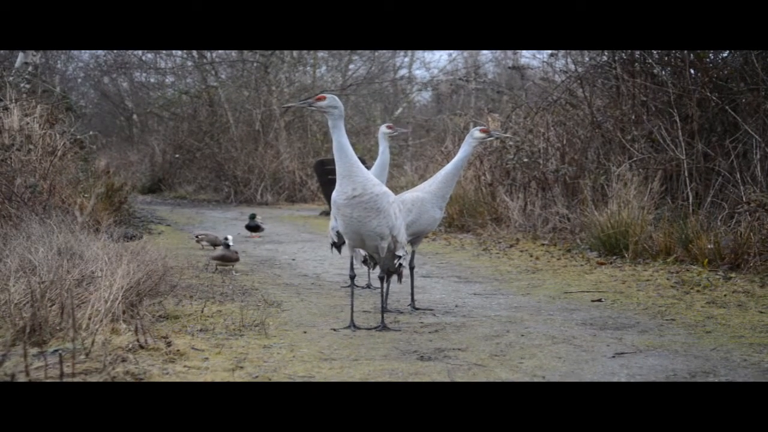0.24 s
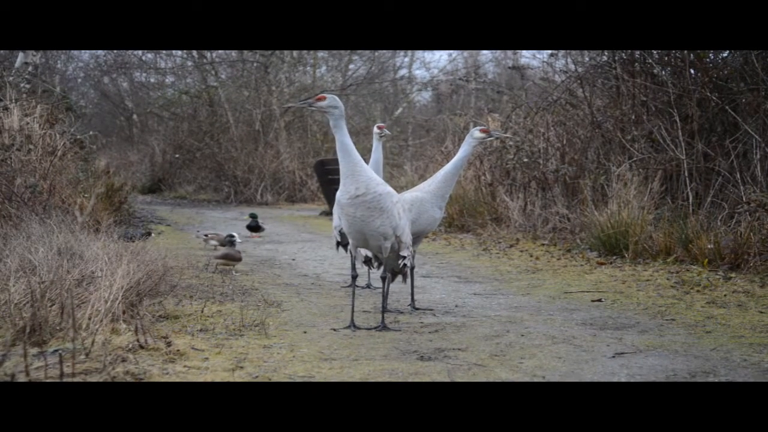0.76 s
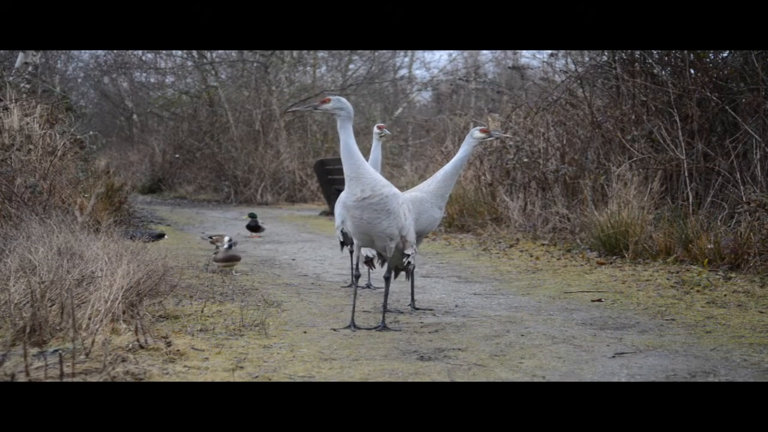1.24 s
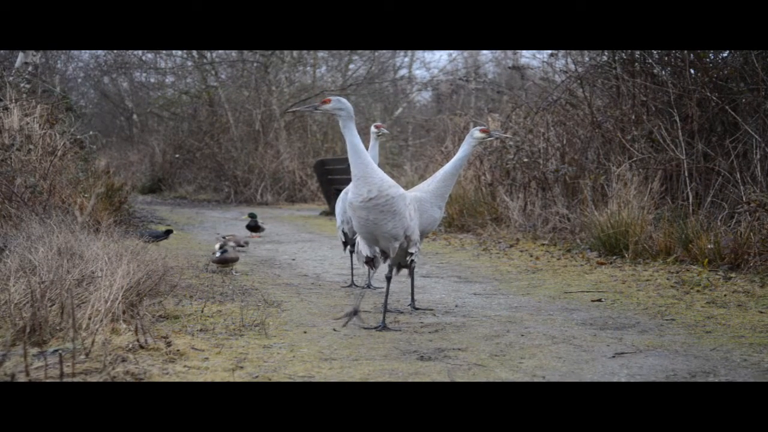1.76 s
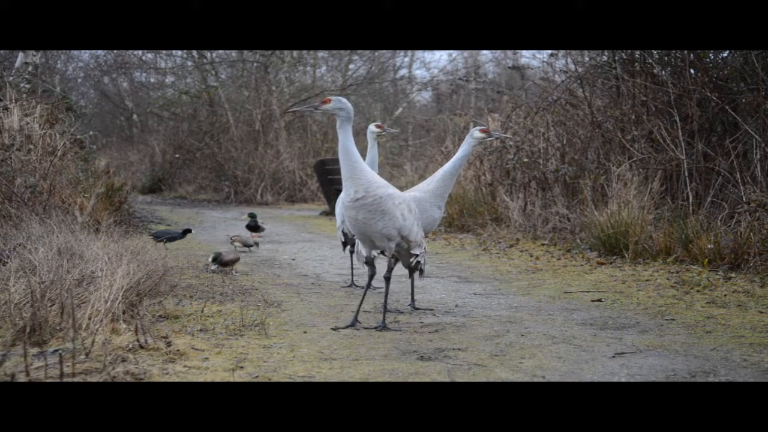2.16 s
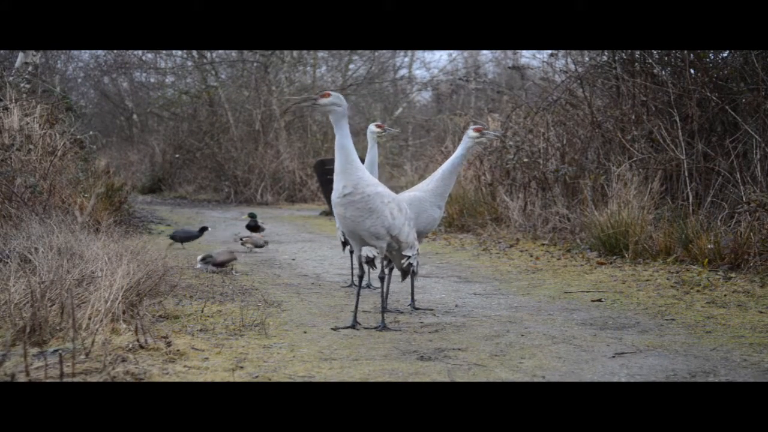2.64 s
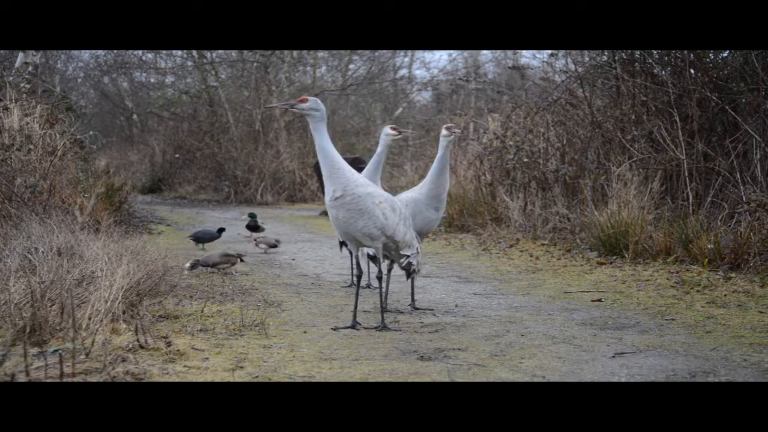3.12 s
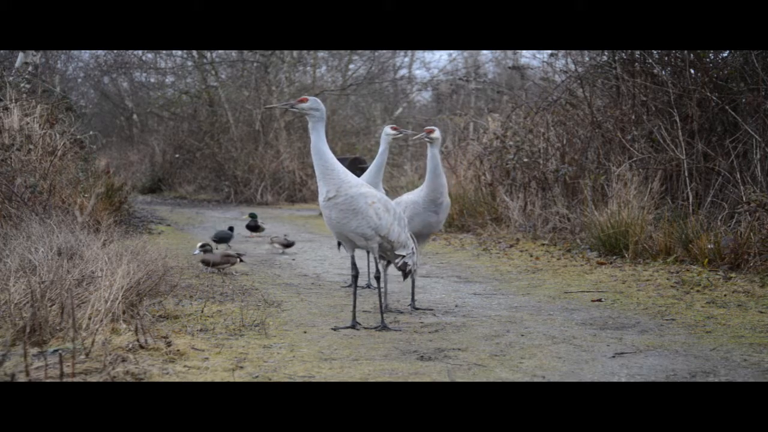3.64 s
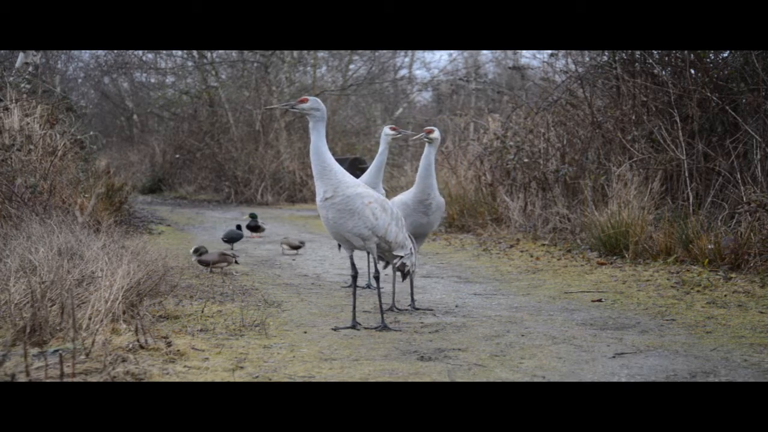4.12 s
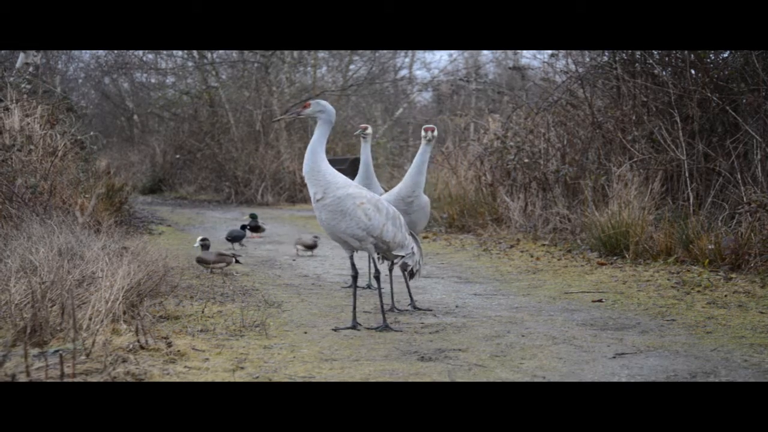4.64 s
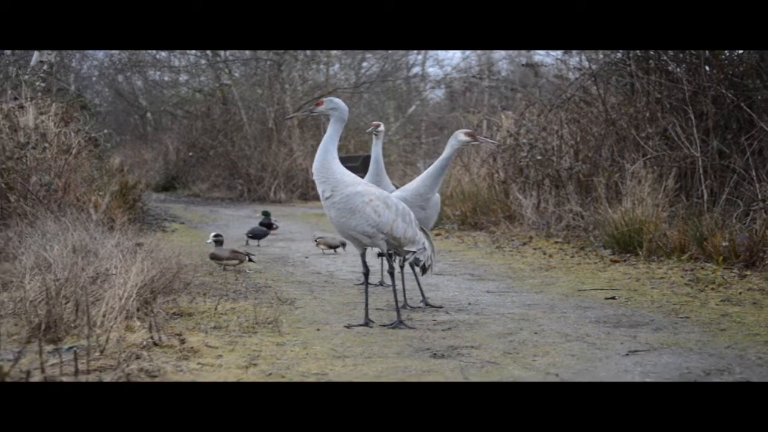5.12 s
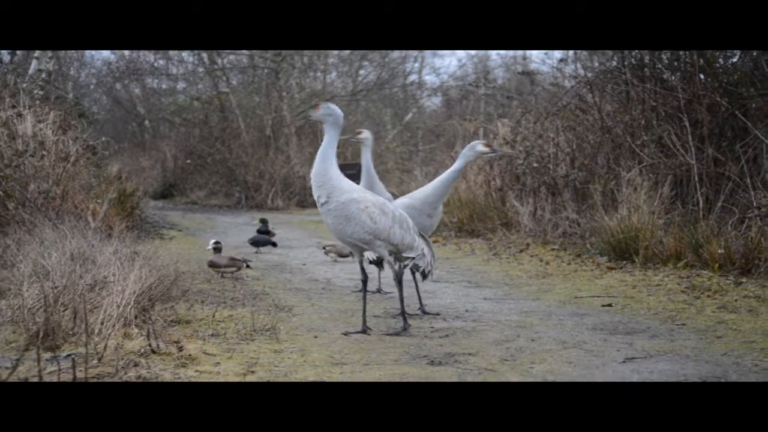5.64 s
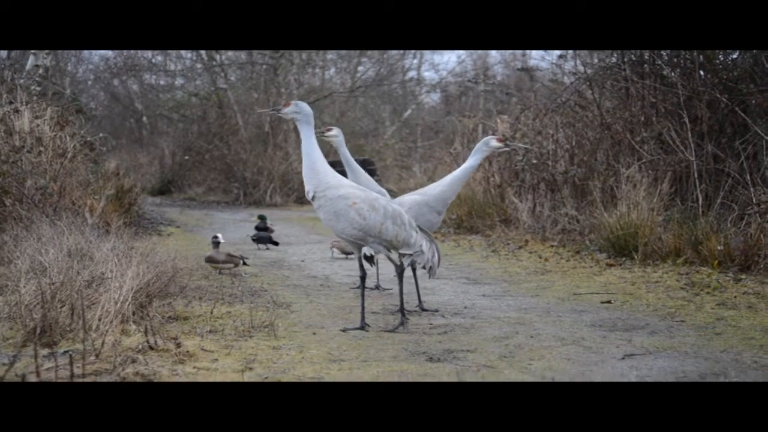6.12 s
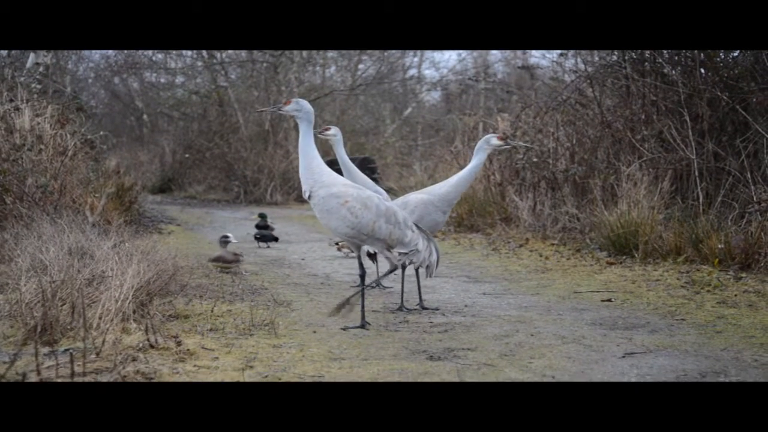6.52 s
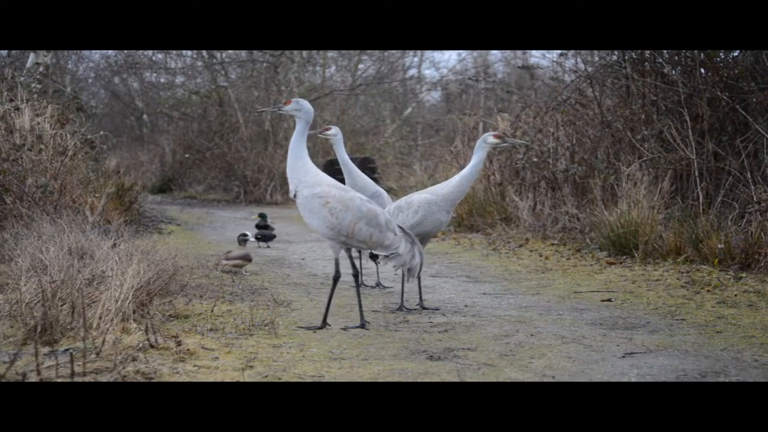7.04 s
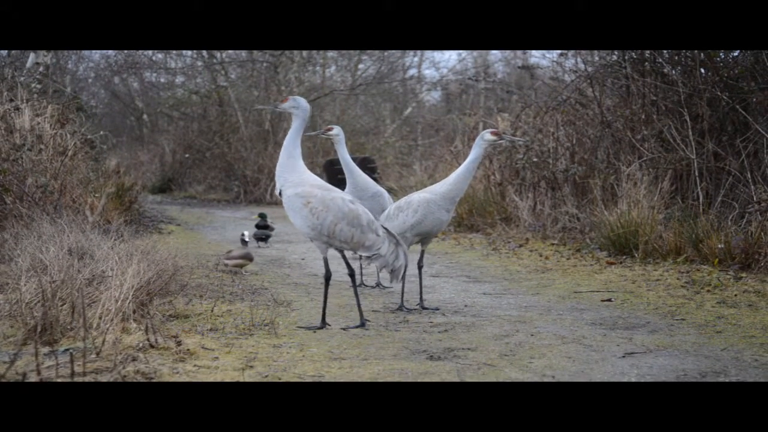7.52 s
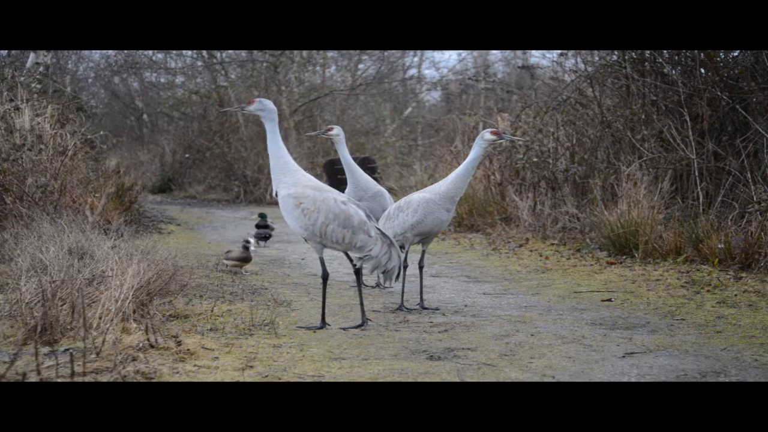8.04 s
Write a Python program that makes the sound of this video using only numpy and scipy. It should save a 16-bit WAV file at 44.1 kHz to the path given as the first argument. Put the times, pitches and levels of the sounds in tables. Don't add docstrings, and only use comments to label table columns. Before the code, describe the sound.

Quiet open air with steady soft hiss, a faint low engine hum drifting in and out and a barely audible thin whine. At 0 s a short close rustle and a cluster of bright clicks on the camera body, thinning to sparse ticks and tiny faint waterfowl peeps until 2.5 s. At 2.56 s cranes suddenly bugle: a very short held reedy note near 1 kHz, then from 2.7 to 3.25 s a loud rolling rattle of overlapping bursts from three birds, deep and higher, quickening and fading into a croak. The thicket echoes faintly. From 4 to 5.6 s there are soft cloth rubs and clicks, with a sharp snap near 4.67 s. At 5.69 s the second call repeats the pattern, rattling until about 6.47 s, slightly clipped and ducking the hiss. The echo decays, leaving hiss, low hum, occasional ticks and peeps until 8.3 s.

```python
import sys
import numpy as np
from scipy import signal
from scipy.fft import rfft, irfft, next_fast_len
from scipy.io import wavfile
from scipy.ndimage import uniform_filter1d, map_coordinates

SR = 44100
rng = np.random.default_rng(int(sys.argv[2]) if len(sys.argv) > 2 else 0)


def store_wav(level_fs):
    pcm = np.round(np.clip(np.atleast_2d(level_fs), -1, 1) * 32767)
    wavfile.write(sys.argv[1], SR, pcm.T.astype(np.int16))


def volts(x):
    e = np.asarray(x, float) / 20
    return 10 ** e


N = 364707


def unit(x):
    return x / np.sqrt(np.mean(x ** 2) + 1e-20)


def along(points, hz):
    f, v = np.transpose(points)
    return np.interp(np.log(hz + 1), np.log(f + 1), v)


def level(rows):
    s, db = np.transpose(rows)
    return volts(np.interp(np.arange(N) / SR, s, db, -150, -150))


def shiver(count, rate):
    knots = rng.standard_normal(int(count * rate / SR) + 4)
    return map_coordinates(knots, [np.arange(count) * rate / SR])


def wobble(rate):
    return shiver(N, rate)


def filtered(x, response):
    m = next_fast_len(N + SR // 2)
    return irfft(rfft(x, m) * response(np.fft.rfftfreq(m, 1 / SR)), m)[:N]


def noise(spectrum):
    return unit(filtered(rng.standard_normal(N), lambda hz: volts(along(spectrum, hz))))


def tail(t60s, count):
    hz, t, z = signal.stft(rng.standard_normal(count), SR, nperseg=128)
    fade = volts(-60 * t / along(t60s, hz)[:, None])
    h = signal.istft(z * fade, SR, nperseg=128)[1]
    return h / np.linalg.norm(h)


def add(track, s, sound):
    start = round(s * SR)
    track[start:start + len(sound)] += sound[:len(track) - start]


# time in seconds, level in dB.
AIR_LEVEL = [(0, -48.5), (0.45, -50), (0.71, -52.5), (3.9, -52), (5.6, -52), (7.1, -50), (8.029, -51),
             (8.27, -53.5)]
# frequency in Hz, density in dB per Hz.
HISS_COLOUR = [(12, -26), (25, -0.5), (70, 6), (150, -3.5), (327, -5.5), (870, -9), (2010, -10),
               (3330, -12.5), (4530, -11.5), (4920, -9.5), (5350, -10), (8370, -21.5), (14600, -25.5),
               (15900, -23)]
# time in seconds, level in dB.
ENGINE_LEVEL = [(0.0, -57), (0.39, -72), (1.31, -58), (2.39, -69), (2.85, -57.5), (4.12, -68), (4.98, -71),
                (5.6, -57), (7.25, -52.5), (8.27, -70)]


def background():
    t = np.arange(N) / SR
    s, db = np.transpose(AIR_LEVEL)
    crackle_db = 0.21 * wobble(2.8) + 1.46 * wobble(120)
    air = volts(np.interp(t, s, db) + 0.5 + crackle_db) * noise(HISS_COLOUR)
    engine_hz, whine_hz = 151, 4815
    engine = np.sin(2 * np.pi * engine_hz * t + .8 * wobble(10))
    engine = level(ENGINE_LEVEL) * volts(3 + 1.3 * wobble(4)) * engine
    whine = volts(-62.0 + 2.3 * wobble(26)) * np.sin(2 * np.pi * whine_hz * t + wobble(40))
    return air + engine + whine


# peak in seconds, rise in seconds, fall in seconds, level in dB, dull part in dB.
RUSTLES = [(0.024, 0.013, 0.035, -28, -1.5), (0.05, 0.025, 0.12, -42.5, -4.5),
           (4.235, 0.026, 0.049, -43, -5), (4.34, 0.074, 0.064, -42.5, -7.5), (4.44, 0.14, 0.18, -38, -6.5),
           (4.71, 0.042, 0.045, -46, 0.5), (4.93, 0.041, 0.037, -44, -13),
           (5.339, 0.018, 0.023, -50.5, -10), (5.435, 0.043, .06, -53.5, -5),
           (5.598, 0.021, 0.022, -36.5, -16), (5.688, 0.019, 0.0082, -27.5, -10)]
# frequency in Hz, density in dB per Hz.
CLOTH_COLOUR = [(2120, -45), (3600, -4.5), (5230, 9.5), (5850, -4.5), (6490, -1), (8500, -19.5),
                (11000, -28.5), (14300, -70.5), (22000, -120)]
# frequency in Hz, density in dB per Hz.
FOLDS_COLOUR = [(290, -31), (500, -1.5), (673, -23), (863, -1.5), (3400, 3), (4420, -70), (7480, -120)]


def rustles():
    edge_db, squareness = 38, 2.8
    slips = volts(1.8 * wobble(250) + .6 * wobble(34))
    s, rise_s, fall_s, db, dull_db = np.transpose(RUSTLES)[:, :, None]
    t = np.arange(N) / SR - s
    away = np.abs(t / np.where(t < 0, rise_s, fall_s))
    swell = volts(db - edge_db * away ** squareness)
    bright = swell.sum(0) * unit(slips * noise(CLOTH_COLOUR))
    dull = (volts(dull_db) * swell).sum(0) * unit(slips * noise(FOLDS_COLOUR))
    return bright + dull


def soft(f):
    return 1 / (1 + 1j * f / 6000) ** 2


# start in seconds, peak in dB, pitch in Hz, length in ms.
SMALL_TONES = [(0.386, -45, 1500, 5.2), (0.728, -49.5, 2260, 19), (1.2494, -59, 3390, 26),
               (1.3594, -56, 2030, 23), (.178, -46, 3150, 7), (.275, -48, 3780, 5), (1.44, -61, 4140, 60),
               (1.526, -52, 624, 17), (1.55, -62, 4100, 100), (1.72, -65, 4200, 70), (2.18, -62, 570, 35),
               (2.327, -52, 4700, 7), (2.388, -52, 1900, 4.2), (5.251, -48, 1720, 4.5), (5.433, -41, 2720, 5),
               (7.232, -51, 526, 8), (7.241, -46, 6360, 9), (7.66, -54, 3070, 5.4), (7.832, -49, 5100, 5),
               (7.935, -57, 3320, 8), (7.97, -65, 876, 200), (8.022, -39, 5500, 4.2), (8.158, -56, 4750, 4),
               (6.6278, -44, 1170, 12), (7.868, -48, 4600, 11)]


def small_tones():
    tones = np.zeros(N)
    for s, db, hz, ms in SMALL_TONES:
        t = np.arange(0, ms / 1000, 1 / SR)
        swell = np.sin(np.pi * t / t[-1])
        add(tones, s, volts(db + 7.0) * np.sin(2 * np.pi * hz * t) * swell)
    return filtered(tones, soft)


# start in seconds, peak in dB, sharp edge in dB.
TICKS_BRIGHT = [(0.0143, -10.5, -26), (0.0249, -16, -37), (0.048, -25, -34), (.08, -31, -34),
                (.101, -32, -30), (0.1237, -36, -28), (0.179, -37.5, -23), (0.2377, -34, -20),
                (0.256, -29, -32), (0.6867, -37, -35), (0.7301, -26.5, -32), (0.989, -26.5, -27),
                (1.2802, -32.5, -34), (1.583, -37, -31), (1.649, -36, -26), (1.667, -41, -28),
                (2.017, -35.5, -40), (2.3066, -38.5, -25), (2.3283, -37.5, -19.5), (2.3863, -35.5, -38),
                (4.546, -41.5, -15), (4.664, -30, -45), (4.6697, 1.5, -50), (4.6721, -12.5, -50),
                (4.778, -30.5, -39), (5.1861, -33.5, -40), (5.255, -35, -26), (5.297, -41, -26),
                (5.422, -34, -30), (5.4373, -28, -28), (5.4905, -35.5, -41.5), (5.509, -32.5, -17),
                (5.5165, -19, -47), (5.678, -17.5, -28), (5.6962, -11.5, -17), (6.932, -20, -30),
                (7.044, -22.5, -45), (7.143, -40.5, -21), (7.8994, -35, -33), (8.0246, -35.5, -16),
                (8.1403, -37, -26)]
# start in seconds, peak in dB, knock in dB, knock pitch in Hz.
TICKS_DULL = [(0.147, -18, -12.5, 1920), (0.2162, -32.5, 4.5, 2670), (0.8737, -38, 0, 2330),
              (1.015, -39.5, 0, 422), (1.3938, -37.5, 3.5, 366), (1.5253, -32.5, 9.5, 920),
              (2.0584, -30.5, 4, 1190), (2.102, -38, 1, 886), (4.047, -25.5, 9, 1170),
              (4.128, -42, -2.5, 770), (4.3343, -38, 14.5, 1570), (4.6711, -24, -3, 910),
              (4.9744, -39, -3, 1620), (5.1756, -14.5, -2, 1720), (5.3216, -34.5, 5, 300),
              (5.3295, -16.5, -5, 2460), (5.5516, -33.5, 0.5, 310), (5.6127, -35.5, 7, 296),
              (5.616, -28.5, -15, 300), (5.9461, -15, 8, 1000), (5.9494, 11, -9.5, 496),
              (5.9505, 5.5, -24.5, 300), (7.2444, -35, -9, 982), (8.2268, -41, 5.5, 784)]
# frequency in Hz, width in Hz, level in dB.
SHELL = [(2667, 1100, -6), (4365, 780, 5), (5430, 1400, 3), (7400, 2400, -11)]


def shell(f):
    modes = 0
    for k, (centre, width, db) in enumerate(SHELL):
        damping = 1j * f * width
        modes = modes + (-1) ** k * volts(db) * damping / (centre * centre - f * f + damping)
    return modes / (1 + 1j * f / 11000) ** 2


def sharp(f):
    return (1j * f / (9000 + 1j * f)) ** 2 / (1 + 1j * f / 12000)


def ticks():
    ring, knock, edge = np.zeros(N), np.zeros(N), np.zeros(N)
    t = np.arange(SR // 30) / SR
    snap_ms, knock_ms = 1, 0.41
    rows = [(s, db, -24.5, 1470, edge_db) for s, db, edge_db in TICKS_BRIGHT]
    rows += [(*row, -25.5) for row in TICKS_DULL]
    for s, db, knock_db, knock_hz, edge_db in rows:
        snap = rng.standard_normal(len(t)) * np.exp(-1000 * t / snap_ms)
        snap[0] = 5.0
        snap = volts(db) * snap / np.linalg.norm(snap)
        thud = np.sin(2 * np.pi * knock_hz * t + 1.34) * np.exp(-1000 * t / knock_ms)
        add(ring, s, volts(19) * snap)
        add(knock, s, volts(db + knock_db + 5.0) * thud)
        add(edge, s, volts(edge_db - 7.5) * snap)
    return filtered(ring, shell) + filtered(knock, soft) + filtered(edge, sharp)


# frequency in Hz, time to fall 60 dB in seconds.
THICKET_DECAY = [(500, 3.37), (1000, 1.62), (2400, 1.77), (3500, 1.6), (5500, 1.19), (9000, 1.3)]
# frequency in Hz, level in dB.
LEAVES_TONE = [(700, -12), (880, -5), (1080, -1.5), (1300, -2), (1600, 1), (1900, 1.5), (2400, 3),
               (3000, -1), (5500, 0), (9000, -2.5)]


def thicket(x):
    build_s, delay_s = 0.037, 0.016
    answer = tail(THICKET_DECAY, count=2 * SR)
    answer = answer * (1 - .7 * np.exp(-np.arange(len(answer)) / SR / build_s))
    wet = signal.fftconvolve(x, np.pad(answer, (round(delay_s * SR), 0)))[:N]
    return filtered(wet, lambda f: volts(along(LEAVES_TONE, f)))


# frequency in Hz, time to fall 60 dB in seconds.
WINDPIPE_DECAY = [(700, 0.14), (1200, 0.017), (3000, 0.057), (6000, 0.0057), (12000, 0.0048)]


def piped(sound, echo_db):
    coil = np.pad(tail(WINDPIPE_DECAY, count=SR // 11), (round(.004 * SR), 0))
    echo = signal.fftconvolve(sound, coil)
    return np.pad(sound, (0, len(echo) - len(sound))) + volts(echo_db) * echo


# frequency in Hz, level in dB.
THROAT_TONE = [(500, -3.5), (1050, 3.5), (1600, -7), (2200, -6.5), (2800, -11), (3300, -7.5), (4500, -6),
               (5500, 0.5), (6500, -7), (8000, -17), (11000, -46.5), (15000, -38.5)]


def reed(pitch_hz, overtones_db, odd_db, rough, count, breaks_db=0):
    order = np.arange(1, count + 1)[:, None]
    hz = order * pitch_hz
    loose = np.clip(hz / 1500 - .4, 0, 1)
    phase = 2 * np.pi * np.cumsum(pitch_hz) / SR
    slip = 2 * np.pi * np.cumsum(pitch_hz * .16 * rough * shiver(len(pitch_hz), 884)) / SR
    bite_db = overtones_db + 3 * rough * shiver(len(pitch_hz), 1100)
    db = along(THROAT_TONE, hz) + bite_db * np.clip(hz / 2000 - .6, 0, 1) + odd_db * (order % 2)
    db = db + loose * (rng.normal(0, 1.6, order.shape) + breaks_db)
    lag = 1.25 * np.pi + .27 * np.pi * loose + .3 * np.pi * (hz > 4800)
    lag = lag + rng.normal(0, .45, order.shape)
    lines = volts(db) * (hz < 15800) * np.cos(order * (phase + loose * slip) + lag)
    return np.sqrt(2) * np.sum(lines, axis=0)


# time in seconds, main line in Hz, level in dB, overtones in dB, halfway lines in dB.
HELD_NOTES = [
    [(2.563, 993, -45.5, -31, -10), (2.568, 938, -16.5, -18.5, -1.5), (2.573, 984, -34, -20.5, -6),
     (2.579, 968, -11.5, -16, -14), (2.592, 990, -14, -17.5, -11.5), (2.597, 1050, -13.5, -3.5, -7),
     (2.622, 1074, -15, -5.5, -2), (2.633, 1090, -11, -12.5, -8), (2.642, 1130, -32, -12.5, 1)],
    [(5.69, 1002, -40.5, -8.5, -3.5), (5.696, 970, -21, -10.5, -1.5), (5.701, 1019, -28, -7.5, -8.5),
     (5.707, 1031, -13, -10, -13.5), (5.72, 1067, -12, -8, -7), (5.742, 1084, -13, -4, -8),
     (5.76, 1107, -12, -13, -5), (5.766, 1088, -19.5, -12, -1), (5.776, 1105, -42.5, 1, -3.5)],
]
FLUTTER_DEPTH = [0.23, 0.46]
THROB_DB = [1.5, 1.5]


def held_notes():
    voice = np.zeros(N)
    throb_hz = 71
    for rows, depth, throb in zip(HELD_NOTES, FLUTTER_DEPTH, THROB_DB):
        s, *columns = np.transpose(rows)
        t = np.arange(s[0], s[-1], 1 / SR)
        line_hz, db, bright_db, halfway_db = [np.interp(t, s, c) for c in columns]
        throb_db = throb * np.cos(2 * np.pi * throb_hz * (t - s[-4]))
        flutter = depth * np.cos(2 * np.pi * np.cumsum(line_hz) / SR / 6 + 1.2 * shiver(len(t), 60))
        rasp = volts(1.5 * shiver(len(t), 700))
        waver = 1 + .03 * flutter + .018 * shiver(len(t), 250)
        breaks_db = 2.5 * shiver(28 * len(t), 200).reshape(28, -1)
        tone = reed(line_hz / 2 * waver, bright_db + throb_db, halfway_db,
                    rough=0.22, count=28, breaks_db=breaks_db)
        note = volts(db + .5 * throb_db) * (1 + flutter) * rasp * tone
        add(voice, t[0], piped(note, echo_db=-17.0))
    return voice


def rebounds(rows, habit):
    head_ms, gap_ms, kept, loss_db, gain_db, attack_ms = habit
    late_ms = 0.6 * rng.standard_normal((len(rows), 4))
    bursts = []
    for i, (s, hz, db, bite_db, ms) in enumerate(rows):
        for k in range(4):
            left_ms = ms - k * gap_ms
            if left_ms > 3 or k == 0:
                start = s + k * (gap_ms + late_ms[i, k]) / 1000
                pitch = hz * kept ** k ** 0.88
                bite = bite_db + gain_db * k ** 1.6
                bursts.append((start, pitch, db - loss_db * k ** 0.55, bite, head_ms, left_ms, attack_ms))
    return bursts


# start in seconds, pitch in Hz, level in dB, overtones in dB, length in ms.
DEEP_BIRD = [(2.7087, 893.4, 2.5, 0, 28), (2.789, 915, 2, 0, 20), (2.8515, 915, 0.5, -1, 22),
             (2.9056, 851, -2.5, 2.5, 18), (2.9563, 814, -1.5, -14.5, 22), (5.8363, 910.5, 4, -7, 30),
             (5.9156, 948.5, -1, -5, 28), (5.9752, 925, -1.5, -5.5, 26), (6.0301, 891, 0, -4.5, 22),
             (6.0851, 903, -1.5, -10, 31), (6.1301, 846, -2.5, -6, 17), (6.1742, 796, -7.5, -7.5, 11)]
HIGH_BIRD = [(2.8194, 948, -7.5, 2, 12), (2.879, 1109, -4.5, 0, 20), (2.942, 1143, -0.5, 0, 24),
             (2.9983, 1200, -4.5, 5, 26), (3.0526, 1144, -3.5, -1, 26), (3.1038, 1132, -1, -1.5, 23),
             (3.1515, 1100, -3.5, -1.5, 20), (3.1958, 969, -6, 1.5, 18), (3.2418, 1070, -13, -4, 13),
             (5.8156, 1290, -10, -18, 11), (5.9604, 1208, -11, -26, 9.9), (6.0242, 1144, -11, -15, 12),
             (6.0907, 1142, -3, 2, 20), (6.154, 1148, -0.5, -0.5, 11), (6.2132, 1155, 0, -2, 12),
             (6.2652, 1130, -1, -2.5, 22), (6.317, 1139, -0.5, -2, 22), (6.3637, 1061, -2.5, 1.5, 20),
             (6.4113, 966, -4.5, 0, 18), (6.458, 950, -12, -7, 10)]
FAR_BIRD = [(2.7033, 988, -10, -28, 12), (2.773, 994, -17, -4.5, 14), (2.7845, 1103, -18, -10.5, 6),
            (2.8325, 1313, -11.5, -0.5, 14), (2.8926, 963, 0, -10.5, 16), (2.953, 1010, -4.5, 6.5, 18),
            (3.0082, 1037, -3, -5, 22), (3.062, 928, -10, 8.5, 11), (3.0725, 1037, -10, -7, 8.9),
            (3.1118, 946, -11.5, -1, 15), (3.159, 994, -14, 9, 16), (5.8034, 853, -3.5, -2, 8.3),
            (5.829, 898, -5, -12, 8), (5.88, 951, -6.5, -1.5, 26), (5.9067, 884, -27, -6, 10),
            (6.0056, 1018, -8, 1.5, 15), (6.06, 940, -8, -5.5, 33), (6.1087, 926, -9.5, -5, 15)]
# clear head in ms, rebound gap in ms, share of pitch kept from 0 to 1,
# loss in dB, overtones gained in dB a rebound, attack in ms.
DEEP_HABIT = (5.8, 8.5, .9, 9.6, 1.3, .9)
HIGH_HABIT = (4.14, 8.5, 1.0, 12.8, 1, 1.17)
FAR_HABIT = (4, 11, 0.74, 8.7, 0.8, 1.1)


def rattles():
    voice = np.zeros(N)
    sag, limping = 0.15, 0.75
    bursts = rebounds(DEEP_BIRD, DEEP_HABIT) + rebounds(HIGH_BIRD, HIGH_HABIT) + rebounds(FAR_BIRD, FAR_HABIT)
    for s, pitch, db, overtones_db, head_ms, end_ms, attack_ms in bursts:
        ms = np.arange(0, 1.4 * end_ms, 1000 / SR)
        spent = np.clip(ms / head_ms, 0, 9)
        rough = np.clip(.08 + .8 * (spent - .9), .06, .5)
        sunk = np.clip((ms - .8 * head_ms) / 17, 0, 1)
        pitch_hz = pitch * (1 - sag * sunk)
        tone = reed(pitch_hz, overtones_db - 1.0 - 3 * sunk, odd_db=1.5, rough=rough, count=17)
        limp = 1 + limping * np.clip(spent - .6, 0, 1) * np.cos(np.pi * np.cumsum(pitch_hz) / SR)
        attack = 1 - np.exp(-(ms / attack_ms) ** 2)
        ragged = 0.39 * np.exp(-ms / 14)
        body = np.maximum(np.exp(-spent ** 3), ragged)
        air_stops = np.exp(-(ms / end_ms) ** 6)
        burst = volts(db - 6.0) * attack * body * air_stops * limp * tone
        add(voice, s, piped(burst, echo_db=-13))
    return voice


# frequency in Hz, level in dB.
BILL_TONE = [(400, -8), (530, -13), (750, 3), (1050, -1.5), (1600, 0.5), (2100, -0.5), (2750, -1.5),
             (3250, 7.5), (5400, -1), (9000, -3)]
# start in seconds, level in dB, pitch in Hz.
CROAKS = [
    (3.24, -39, 480),
    (6.455, -38, 480),
]


def cranes():
    def low_cut(f):
        return 1 / (1 + (735 / (f + 1)) ** 14) + .012 * (f > 250)

    voice = filtered(rattles(), low_cut)
    voice = voice + filtered(held_notes(), lambda f: volts(along(BILL_TONE, f)))
    t = np.arange(SR // 90) / SR
    for s, db, hz in CROAKS:
        add(voice, s, volts(db) * np.hanning(len(t)) * np.sin(2 * np.pi * hz * t))
    return voice


def scene():
    voice = cranes()
    loud = uniform_filter1d(np.abs(voice), round(.12 * SR), origin=round(0.042 * SR))
    echo = volts(-18.5) * thicket(voice) / (1 + 1.1 * loud)
    quiet = background() / (1 + 12 * loud)
    return (voice + echo + ticks() + small_tones() + rustles() + quiet)[None]


def roll_off(x):
    return signal.sosfilt(signal.butter(12, 16070, fs=SR, output="sos"), x)


def record(dry):
    clipped = dry / (1 + np.abs(dry / 1.16) ** 24) ** (1 / 24)
    mix = filtered(clipped[0], lambda f: 1j * f / (90 + 1j * f))[None]
    return roll_off(mix)


dry = scene()
out = record(dry)
store_wav(out)
```